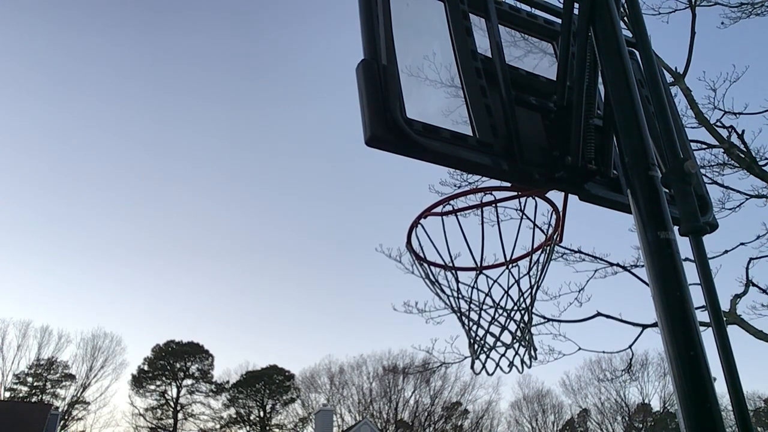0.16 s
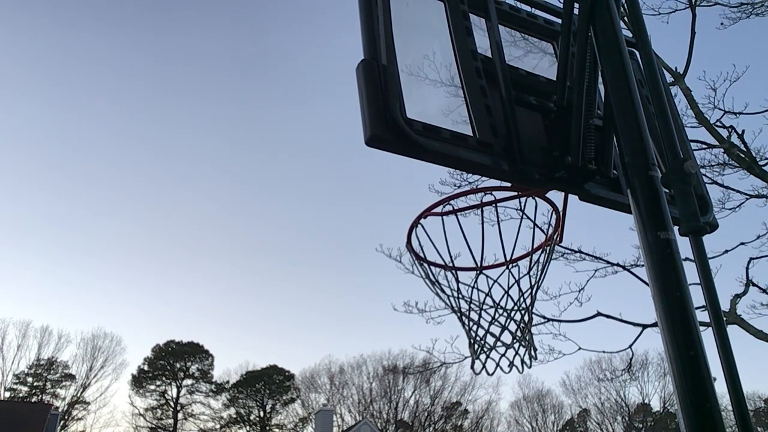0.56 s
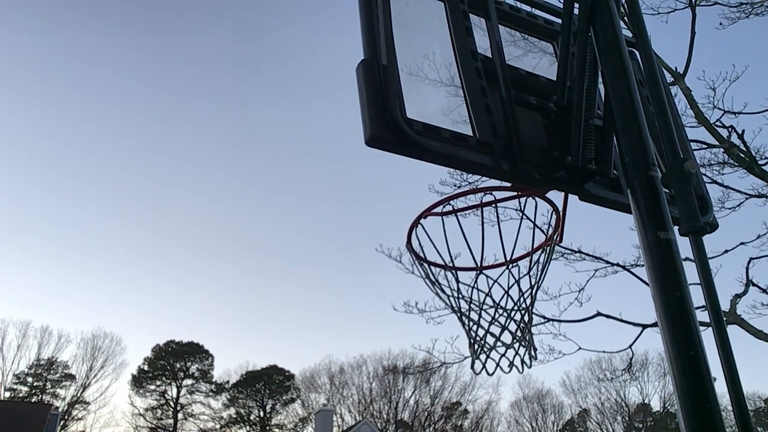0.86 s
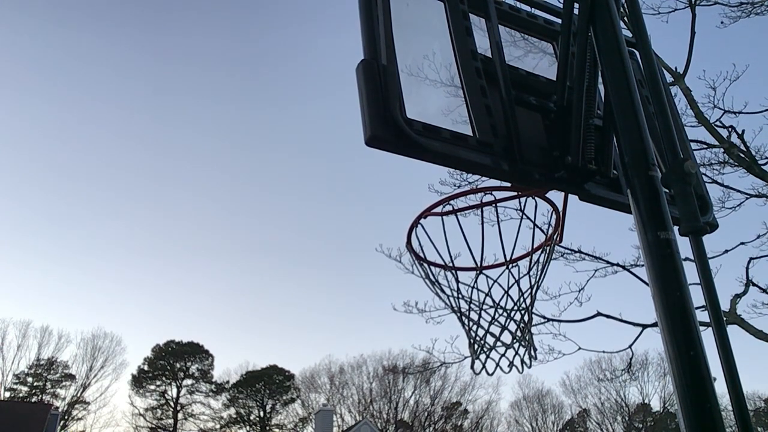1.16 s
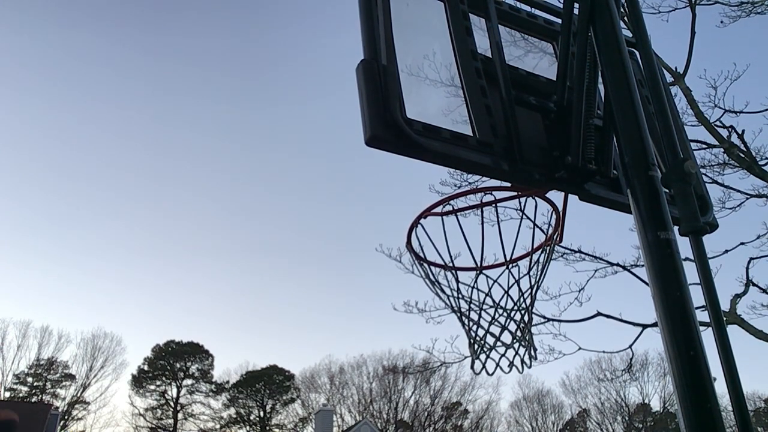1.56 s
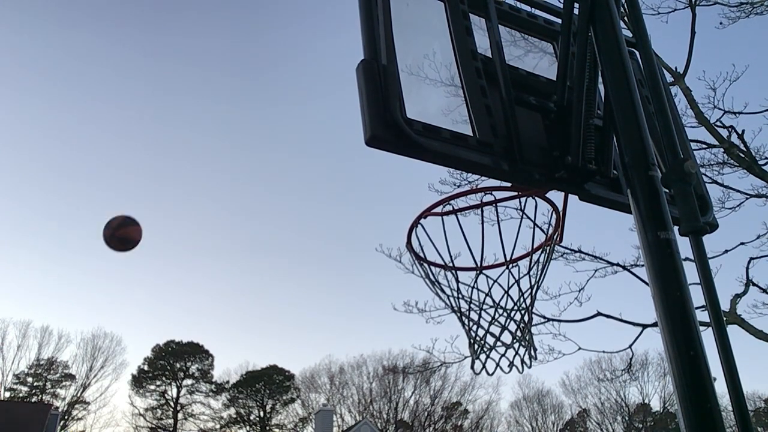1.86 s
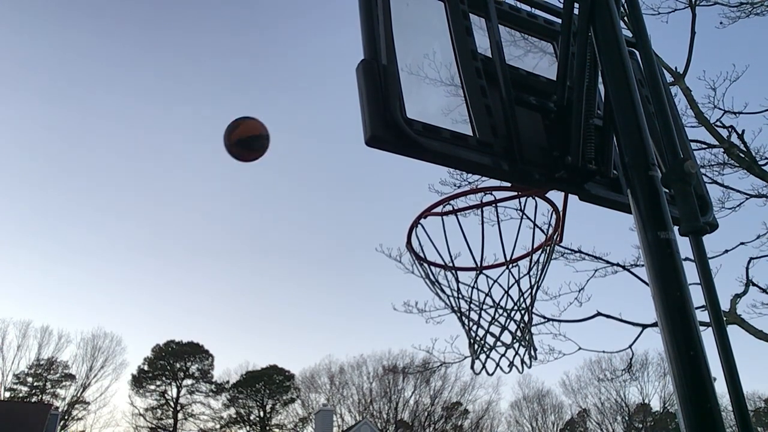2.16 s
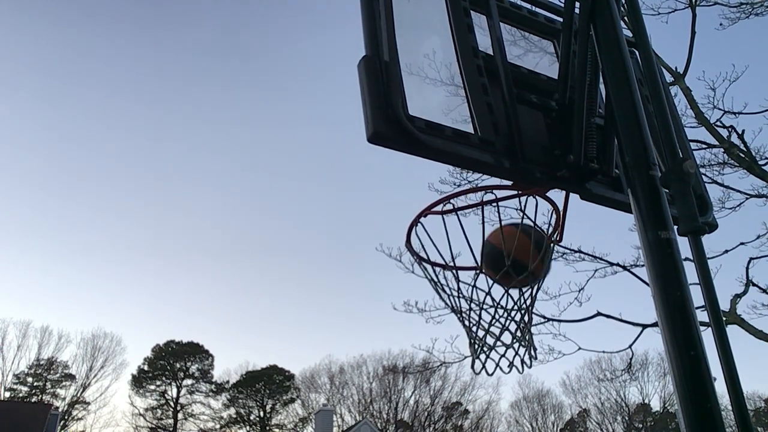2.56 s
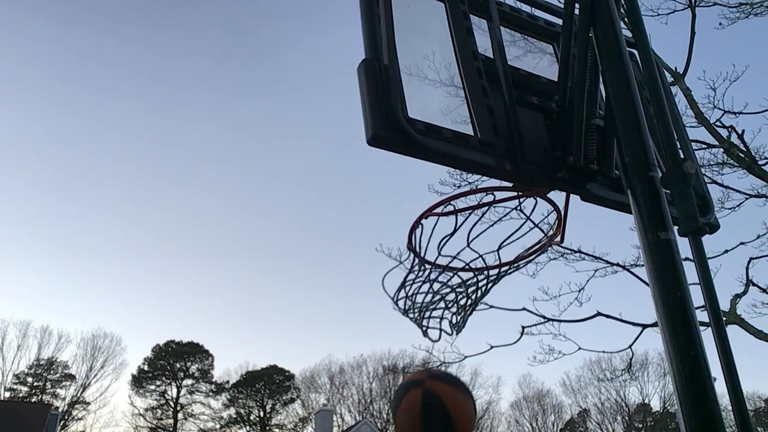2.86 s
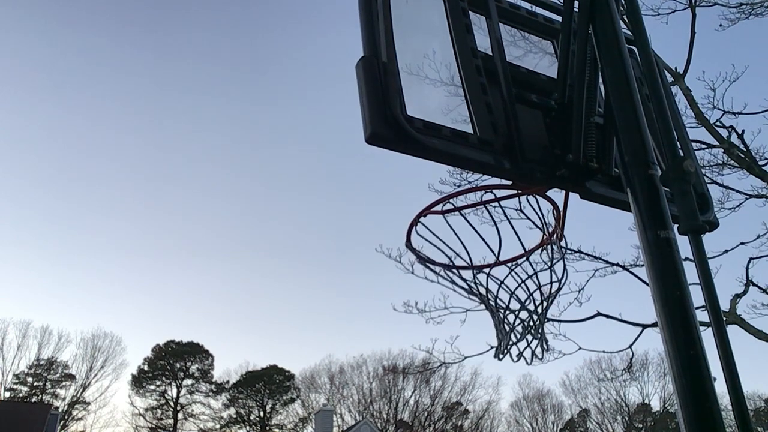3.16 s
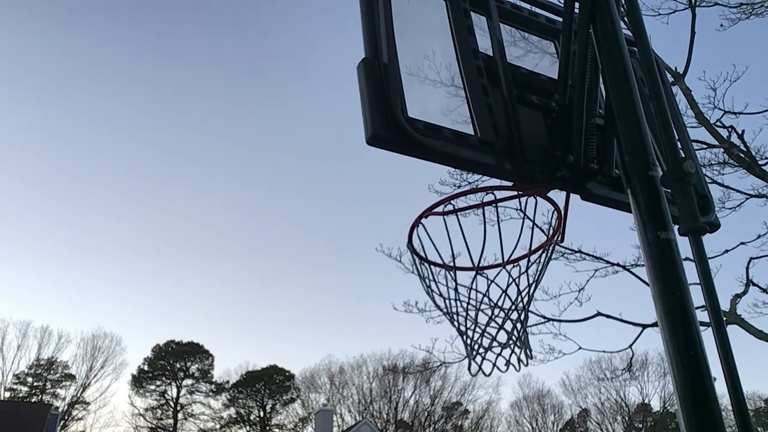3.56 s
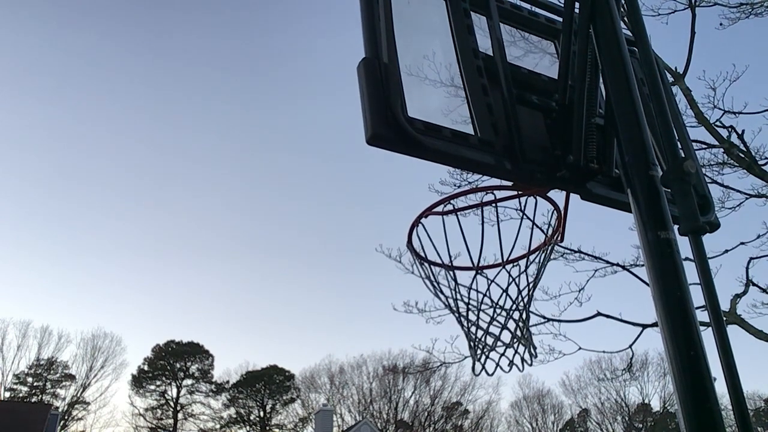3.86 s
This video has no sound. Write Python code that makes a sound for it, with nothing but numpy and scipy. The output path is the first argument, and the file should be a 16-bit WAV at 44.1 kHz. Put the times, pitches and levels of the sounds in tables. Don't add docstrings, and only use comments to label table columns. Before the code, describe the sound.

A basketball strikes an outdoor hoop's rim with a sharp clack, drags through the net and rattles the frame, then thumps on the hollow base; earlier, shoes scuff gritty asphalt near the microphone over distant traffic.

```python
import sys
import numpy as np
from scipy import signal
from scipy.fft import rfft, irfft, next_fast_len
from scipy.io import wavfile
from scipy.ndimage import uniform_filter1d, map_coordinates

SR = 44100
rng = np.random.default_rng(int(sys.argv[2]) if len(sys.argv) > 2 else 0)


def ratio_of_db(decibels):
    return 10 ** (np.asarray(decibels, float) / 20)


def generate_wav(sig):
    pcm = np.round(np.clip(np.atleast_2d(sig).T, -1, 1) * 32767).astype(np.int16)
    wavfile.write(sys.argv[1], SR, pcm)


N = 176400
TIME_S = np.arange(N) / SR


def unit(x):
    return x / np.sqrt(np.mean(x ** 2) + 1e-20)


def along(points, hz):
    f, v = np.transpose(points)
    return np.interp(np.log(hz + 1), np.log(f + 1), v)


def curves(rows):
    s, *cols = np.transpose(rows)
    return [np.interp(TIME_S, s, c) for c in cols]


def wobble(rate):
    return map_coordinates(rng.standard_normal(8000), [np.arange(N) * min(rate, 1900) / SR])


def filtered(x, response):
    m = next_fast_len(N + SR // 2)
    return irfft(rfft(x, m) * response(np.fft.rfftfreq(m, 1 / SR)), m)[..., :N]


def noise(spectrum):
    return unit(filtered(rng.standard_normal(N), lambda hz: ratio_of_db(along(spectrum, hz))))


def patchy(x, patchy_db):
    z = signal.stft(x, nperseg=256)[2]
    field = rng.standard_normal(z.shape)
    field = uniform_filter1d(uniform_filter1d(field, 3, 0), 3, 1)
    return unit(signal.istft(z * ratio_of_db(patchy_db * unit(field)), nperseg=256)[1][:N])


def peaks(rows):
    def response(f):
        total = 0
        for k, (centre, width, db) in enumerate(rows):
            damping = 1j * f * width
            total = total + (-1) ** k * ratio_of_db(db) * damping / (centre ** 2 - f ** 2 + damping + 1e-9)
        return total
    return response


def ring(s, modes, attack, rough=0):
    t = np.maximum(TIME_S - s, 0)
    i = slice(int(s * SR), int((s + .7) * SR))
    u = t[i]
    out = np.zeros(N)
    for hz, db, t60 in modes:
        drift = rough * hz / 1000 * np.cumsum(rng.standard_normal(len(u)))
        out[i] += ratio_of_db(db - 60 * u / t60) * np.sin(2 * np.pi * hz * u + drift)
    return out * (1 - np.exp(-t / attack))


# pitch_hz, level_db per Hz
ROAD_SPECTRUM = [(18, -72), (30, -35), (81, -5.5), (160, -14), (361, -20), (391, -18), (549, -18),
                 (1110, -32), (15700, -50)]
# time_s, level_db
ENGINE_LEVEL = [(0.0, -66), (0.12, -53.5), (0.79, -61.5), (0.88, -53.5), (1.01, -82), (1.02, -66),
                (1.32, -64), (1.44, -53), (2.19, -68), (2.21, -58), (2.46, -79), (2.5, -55)]
# time_s, level_db
ROAD_SWELL = [
    (0, 0.5),
    (.7, -1),
    (1.4, 0),
    (2.4, 0),
    (3.9, -1),
]
ROAD_DB, HISS_FROM_HZ = -59, 1200
ENGINE_HZ, ENGINE_WANDER_HZ = 78, 5.1


def traffic():
    engine_db, = curves(list(ENGINE_LEVEL) + [(3.4, -58), (3.6, -57), (3.9, -58)])
    swell_db, = curves(ROAD_SWELL)
    engine = np.sin(2 * np.pi * np.cumsum(ENGINE_HZ + ENGINE_WANDER_HZ * wobble(12)) / SR)
    air = noise(ROAD_SPECTRUM)
    road = filtered(air, lambda f: 1 / (1 + (f / HISS_FROM_HZ) ** 2))
    hiss = air - road
    swelling = road * ratio_of_db(swell_db + 0.19 * wobble(20))
    return ratio_of_db(ROAD_DB) * (hiss + swelling) + ratio_of_db(engine_db + 1.6 * wobble(15)) * engine


# pitch_hz, level_db per Hz
GRIT_HISS = [(3000, -31), (6000, -8.5), (8500, -7.5), (10500, -5.5), (12500, -0.5), (14000, -4.5),
             (15600, -16)]
# pitch_hz, level_db per Hz
DULL_SCRAPE = [(250, -2), (500, 2.5), (1200, 1), (2000, -4), (4000, -6.5), (7000, -15), (12000, -45)]
GRIT_DB, GRIT_RATE = 2.5, 900
RUB_T60, SLAP_T60 = 0.072, 0.02


def grit():
    return unit(ratio_of_db(GRIT_DB * wobble(GRIT_RATE) + 1.5 * wobble(150)))


def rubbing(rows, t60, hiss=GRIT_HISS):
    bright, dull = np.zeros(N), np.zeros(N)
    for s, rise, hold, db, dull_db in rows:
        u = TIME_S - s
        release_db = -60 * np.clip(u - rise - hold, 0, 1) / t60
        stroke = np.clip(u / rise, 0, 1) ** 2 * ratio_of_db(db + release_db)
        bright += stroke * ratio_of_db(-dull_db / 2)
        dull += stroke * ratio_of_db(dull_db / 2)
    bright_rub = bright * grit() * patchy(noise(hiss), patchy_db=1.5)
    dull_rub = dull * grit() * patchy(noise(DULL_SCRAPE), patchy_db=3)
    return bright_rub + dull_rub


# start_s, rise_s, hold_s, level_db, dull_over_bright_db
SHOE_SCUFFS = [(.149, 0.0036, 0.021, -53.5, 4.5), (.277, 0.0021, 0.0035, -48, 5),
               (.71, 0.0067, 0.043, -63, 1), (.905, 0.0024, .006, -72.5, -3),
               (1.092, 0.0022, 0.012, -55.5, -2.5), (1.1, 0.017, 0.011, -52, 2),
               (1.449, 0.0012, 0.01, -65.5, 4), (.5, 0.018, 0.043, -80.5, -3),
               (1.736, 0.0012, 0.01, -55.5, 6.5), (1.795, 0.0015, 0.0041, -64, 13),
               (1.835, 0.0054, 0.03, -67, 0), (1.965, 0.0005, 0.0016, -71, 6),
               (1.975, .001, 0.0028, -73, 10), (2.151, 0.0011, 0.021, -50.5, 5.5),
               (3.14, 0.0026, 0.011, -58.5, 2.5), (3.173, 0.0049, 0.0068, -49.5, -5),
               (3.19, 0.0023, 0.014, -54, -3), (3.44, 0.0051, 0.013, -64, 2),
               (3.484, 0.00084, 0.011, -64.5, 18), (3.583, 0.0034, 0.065, -64, 2.5),
               (3.65, 0.0083, 0.025, -60, 4), (3.868, 0.0023, 0.054, -67, 7),
               (3.955, 0.003, 0.0075, -68, -6)]


def shoes():
    return rubbing(SHOE_SCUFFS, RUB_T60)


# start_s, level_db, pitch_hz,
# t60_s
CLACKS = [(0.164, -46, 1880, 0.041), (.168, -47.5, 640, 0.11), (1.796, -39, 800, 0.015),
          (1.737, -38, 1090, 0.013), (1.741, -39.5, 540, 0.031), (1.8, -42.5, 340, .04),
          (1.449, -48, 1130, 0.027), (1.45, -46, 620, .04), (2.153, -42, 600, .04),
          (3.868, -48, 600, .04), (3.5, -52, 4900, .03), (2.97, -50, 765, .35),
          (3.486, -45, 2700, .025), (3.334, -25.5, 104, 0.086), (3.366, -36, 98, 0.073),
          (3.024, -46, 3960, .02), (0.284, -30, 199, 0.054), (.33, -64, 1500, 0.68),
          (2.16, -47, 1860, 0.12), (2.16, -47.5, 1400, 0.075), (.153, -45, 1800, .03),
          (.155, -47.5, 3500, 0.033), (2.565, -13, 630, 0.0067), (2.62, -28, 1110, 0.031),
          (2.661, -38.5, 5960, 0.036), (2.6, -29, 72, .35), (2.645, -33.5, 159.3, 0.22),
          (2.695, -35, 6240, 0.018), (2.749, -42, 5120, 0.032), (2.809, -37.5, 1173, 0.042),
          (2.855, -36.5, 1200, 0.057), (3.175, -22.5, 900, 0.0077), (3.195, -23.5, 1480, 0.0068),
          (2.78, -40.5, 79, 1.43)]


def clacks():
    return sum(ring(s, [(hz, db, t60)], attack=1.1 / hz, rough=.045) for s, db, hz, t60 in CLACKS)


# time_s, pitch_hz, level_db
JOINT_SQUEAK = [
    (2.852, 4000, -66),
    (2.866, 4220, -56),
    (2.905, 4290, -55),
    (2.922, 4200, -60),
    (2.935, 4120, -63),
    (2.962, 4200, -59),
    (2.972, 4200, -70),
    (3.03, 4150, -68),
]


def joint():
    before = (JOINT_SQUEAK[0][0] - .01, 4250, -200)
    after = (JOINT_SQUEAK[-1][0] + .01, 4200, -200)
    hz, db = curves([before] + list(JOINT_SQUEAK) + [after])
    flutter_db = 3.5 * wobble(200)
    flutter_hz = 110 * wobble(400) + 40 * wobble(50)
    phase = 2 * np.pi * np.cumsum(hz + flutter_hz) / SR
    return ratio_of_db(db + flutter_db) * (np.sin(phase) + .15 * np.sin(2 * phase))


# time_s, level_db
HOOP_SHAKE = [
    (2.539, -60),
    (2.543, -34.5),
    (2.804, -43.5),
    (2.834, -40),
    (3.07, -47),
    (3.162, -53.5),
    (3.178, -42.5),
    (3.25, -58.5),
]
# time_s, level_db
LANDING_SHAKE = [
    (3.28, -49),
    (3.285, -33.5),
    (3.33, -41),
    (3.42, -64.5),
    (3.901, -70),
]
# pitch_hz, width_hz, level_db
FRAME_MODES = [(131, 30, -2), (214, 56, -3), (261.3, 31.6, 2.5), (356, 29, -0.5), (435, 40, -2.5),
               (529, 56, -3.5), (637, 56, -8), (767, 54, -14), (1200, 246, -21.5)]
KNOCKS_PER_S, KNOCK_SPREAD_DB, BUZZ = 200, 2.5, .6


def frame():
    quiet = (HOOP_SHAKE[0][0] - .001, -120)
    shake_db, = curves([quiet] + list(HOOP_SHAKE) + list(LANDING_SHAKE))
    strengths = ratio_of_db(KNOCK_SPREAD_DB * rng.standard_normal(N)) * rng.choice([-1, 1], N)
    knocks = (rng.random(N) < KNOCKS_PER_S / SR) * strengths
    drive = unit(knocks) + BUZZ * rng.standard_normal(N)
    scale = np.std(filtered(drive, peaks(FRAME_MODES)))
    return filtered(drive * ratio_of_db(shake_db), peaks(FRAME_MODES)) / scale


# start_s, rise_s, hold_s, level_db, dull_over_bright_db
NET_RUBS = [(2.542, 0.00092, 0.015, -45.5, 7.5), (2.58, 0.023, 0.507, -65, 11),
            (2.6175, 0.0005, 0.028, -45.5, 9.5), (2.655, 0.0089, 0.024, -49, -2),
            (2.692, 0.0025, 0.022, -48.5, 2), (2.722, 0.0053, 0.023, -47.5, 0),
            (2.807, 0.0015, 0.0043, -51, 17), (2.853, 0.0024, 0.0064, -53.5, 19),
            (2.917, 0.00099, 0.0041, -64, -26), (2.971, .0005, 0.012, -52.5, -1),
            (3.023, 0.0015, 0.0091, -66, 13), (3.05, .004, 0.017, -69.5, 20.5)]
# start_s, rise_s, hold_s, level_db, dull_over_bright_db
KNOT_TICKS = [
    (.151, .0005, .003, -52, 3),
    (1.966, .0004, .001, -63, 10),
    (2.592, .0005, .001, -52, -4),
    (2.604, .0005, .001, -53, 0),
    (2.611, .001, .003, -54, -8),
    (2.743, .0003, .0005, -46, 12),
    (2.837, .0005, .001, -59, -10),
    (3.869, .0005, .002, -66, 10),
]


def net():
    return rubbing(NET_RUBS, RUB_T60) + rubbing(KNOT_TICKS, SLAP_T60)


# start_s, level_db
RIM_HIT = [
    (2.5409, -9),
]
# pitch_hz, level_db, t60_s
CLICK_MODES = [(487, -11, 0.036), (1300, -12, 0.0066), (3920, -3.5, 0.0038), (4620, -5, 0.0045),
               (7700, -8, 0.0072), (8260, -2.5, .004), (12430, -2, 0.0043), (12300, -14, 0.019),
               (13800, -19, .004), (8470, -21, .02)]


def click():
    (s, db), = RIM_HIT
    return ratio_of_db(db - 7) * ring(s, CLICK_MODES, attack=.00004, rough=.008)


# pitch_hz, level_db, t60_s
BASE_MODES = [(523, -19.5, 0.056), (759, -33, 0.13), (1067, -33, .07), (1310, -33.5, 0.082),
              (217, -18.5, 0.039), (1514, -37, 0.074), (2626, -42, .12), (2050, -36, .1), (2400, -38, .08),
              (1750, -36, .08)]
# pitch_hz, level_db, t60_s
SHELL_MODES = [(159, -14.5, 0.051), (399, -17, .08), (450, -25, 0.066), (546.6, -23.5, .16),
               (591, -19.5, 0.058), (635, -23, 0.041)]
# pitch_hz, level_db, t60_s
POST_MODES = [(2860, -65, 2.2), (2775, -58, .25)]
# start_s, rise_s, hold_s, level_db, dull_over_bright_db
SKIN_SLAPS = [
    (3.2784, 0.00015, .001, -31, 14),
    (3.2828, 0.00035, 0.0052, -36.5, -9),
    (3.289, 0.0011, 0.012, -40, 5.5),
    (3.302, .0005, .002, -37.5, 12.5),
    (3.308, 0.0023, .028, -45, 7),
    (3.3175, .0005, .001, -45.5, -16),
    (3.34, 0.0023, .03, -53.5, 8),
]
# pitch_hz, level_db per Hz
SKIN_HISS = [(3000, -22), (5000, -8), (7000, -1.5), (9500, -5), (12000, -3), (14000, -7.5), (14600, -40)]
LAND_S, SQUASH_S, FLEX_S = 3.2785, .014, .008
THUMP_HZ, THUMP_DROP_HZ, DROP_S, THUMP_T60, THUMP_DB = 81, 55, .004, .052, -18.5


def landing():
    t = np.maximum(TIME_S - LAND_S - SQUASH_S, 0)
    turns = THUMP_HZ * t + THUMP_DROP_HZ * DROP_S * (1 - np.exp(-t / DROP_S))
    boom = ratio_of_db(THUMP_DB - 60 * (t / THUMP_T60) ** 3) * np.sin(2 * np.pi * turns)
    base = ring(LAND_S, BASE_MODES, attack=.002, rough=.03)
    shell = ring(LAND_S + FLEX_S, SHELL_MODES, attack=.003, rough=.03)
    post = ring(LAND_S, POST_MODES, attack=.005, rough=.02) * ratio_of_db(4 * wobble(25))
    return boom + base + shell + post + rubbing(SKIN_SLAPS, SLAP_T60, SKIN_HISS)


# pitch_hz, t60_s
YARD_DECAY = [(100, 0.56), (600, 0.3), (3000, 0.43), (12000, 0.26)]
# pitch_hz, level_db
WALL_COLOUR = [(100, -5.5), (400, -1.5), (3000, 2), (12000, 2.5)]
YARD_DB = -11.5


def yard(x):
    out, step = np.zeros(N + SR), SR // 8
    for i in range(0, N, step):
        hz, t, z = signal.stft(rng.standard_normal(SR // 3), SR, nperseg=256)
        decay = ratio_of_db(-60 * t / along(YARD_DECAY, hz)[:, None])
        tail = signal.istft(z * decay, SR, nperseg=256)[1]
        wet = signal.fftconvolve(x[i:i + step], tail / np.linalg.norm(tail))
        out[i + 130:][:len(wet)] += wet
    return ratio_of_db(YARD_DB) * filtered(out[:N], lambda f: ratio_of_db(along(WALL_COLOUR, f)))


def scene():
    far = traffic()
    near = shoes() + clacks() + joint() + frame() + net() + landing()
    hit = click()
    echo = yard(near + 0.4 * hit)
    return (far + near + hit + echo)[None]


def low_pass(x):
    return signal.sosfilt(signal.butter(12, 15850, fs=SR, output="sos"), x)


# pitch_hz, level_db
MIC_TREBLE = [(9000, 1), (12500, 1.5), (14500, -3.5), (15300, -4), (16000, -32)]
MIC_CUT_HZ = 42


def record(dry):
    def microphone(f):
        s = 1j * f
        bass_cut = s ** 2 / (s ** 2 + 1.2 * s * MIC_CUT_HZ + MIC_CUT_HZ ** 2)
        return bass_cut ** 2 * ratio_of_db(along(MIC_TREBLE, f))
    return low_pass(filtered(dry, microphone))


dry = scene()
out = record(dry)
generate_wav(out)
```